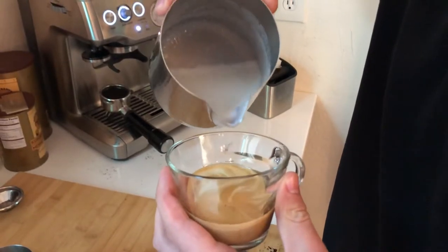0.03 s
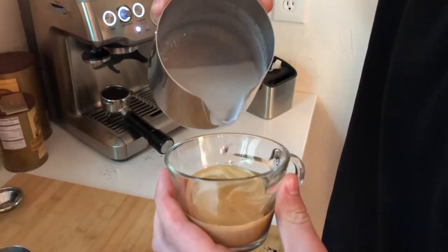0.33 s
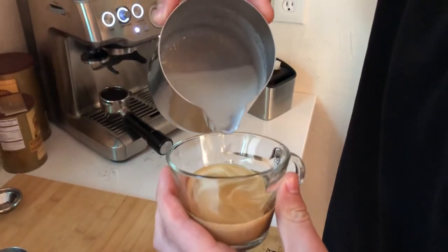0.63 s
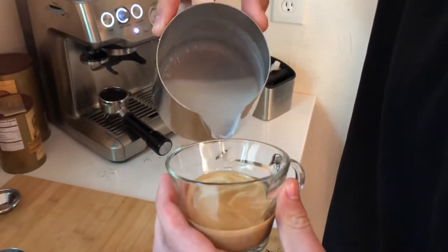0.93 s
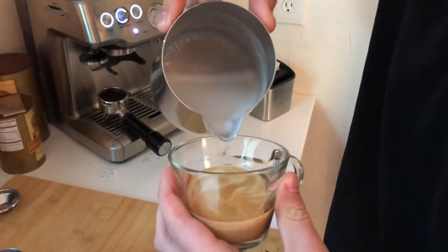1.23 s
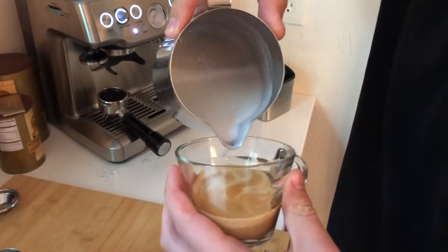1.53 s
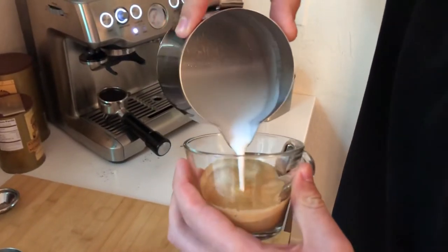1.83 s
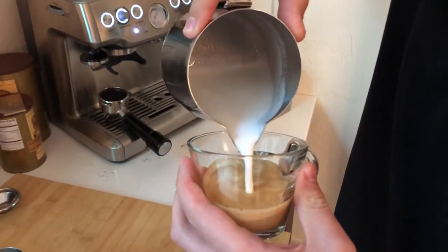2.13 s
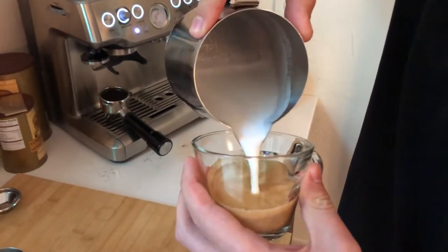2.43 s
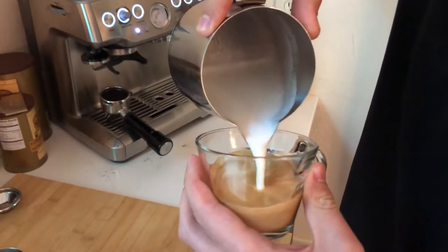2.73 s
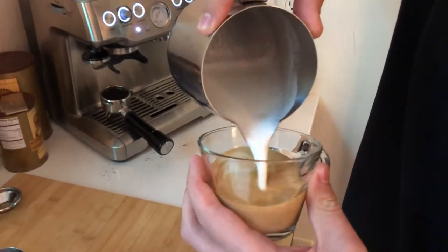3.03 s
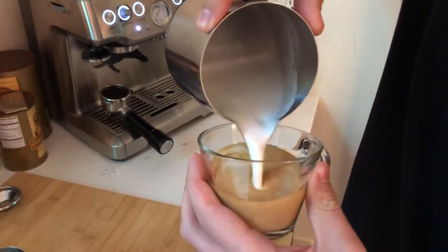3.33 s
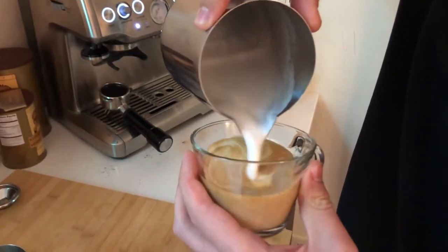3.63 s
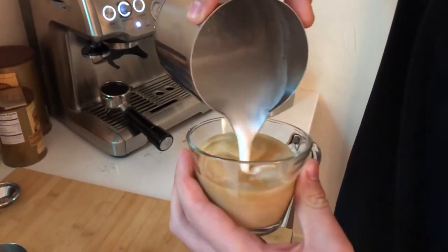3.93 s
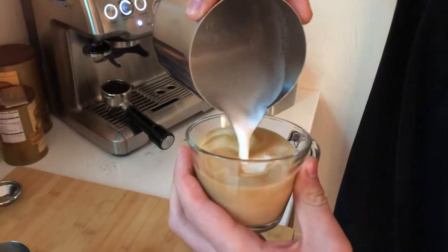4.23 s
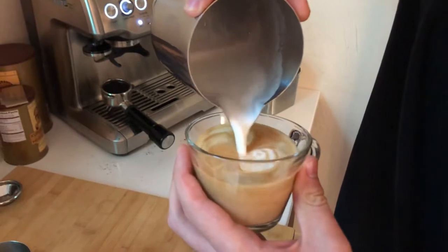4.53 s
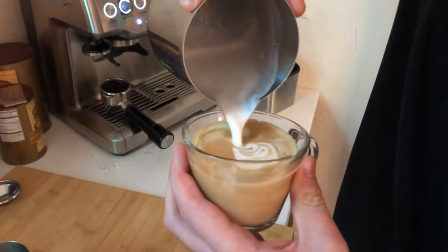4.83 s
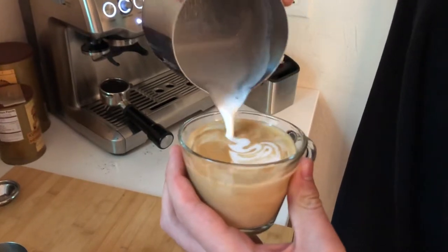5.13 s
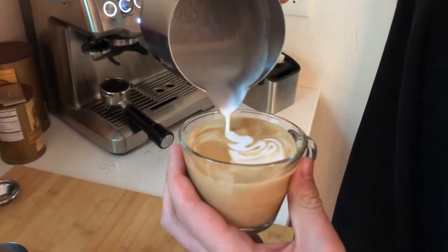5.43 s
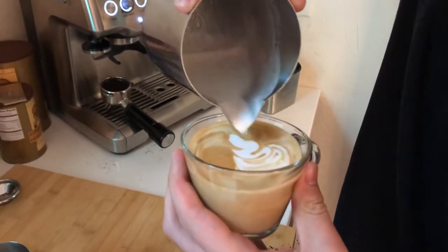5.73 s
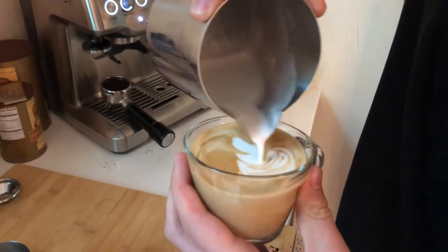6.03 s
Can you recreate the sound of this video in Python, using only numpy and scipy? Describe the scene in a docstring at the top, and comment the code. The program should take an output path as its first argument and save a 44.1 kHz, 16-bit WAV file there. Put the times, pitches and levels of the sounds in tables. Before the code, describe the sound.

Soft handling bumps and a low rumble come first. About a second in, a steel pitcher strikes a glass cup with a sharp clink and a short ring. Faint, thin squeaks follow, and milk lands with a tiny plip and a slowly growing fizz of foam. Later the spout ticks lightly on the rim and scrapes softly a few times. Everything is close to the microphone in a quiet kitchen.

```python
"""Milk poured from a steel pitcher into a hand-held glass cup, close to one microphone in a quiet kitchen.
Soft bumps and a low rumble come first, as the hands move into place. At one second the pitcher clinks
against the cup, and faint, thin, high squeals follow in short bursts. The first milk lands with
a plip and a thin fizz of foam grows. The spout ticks on the rim, the rumble swells a little as the
pitcher rocks, and the spout drags a few times. From five seconds on, fizz, bumps and room noise remain."""
import sys
import numpy as np
from scipy import signal
from scipy.fft import rfft, irfft, next_fast_len
from scipy.io import wavfile
from scipy.ndimage import uniform_filter1d

SR = 44100
rng = np.random.default_rng(int(sys.argv[2]) if len(sys.argv) > 2 else 0)


def log_audio(samples):
    """Write samples as a 16-bit WAV file to the path given in sys.argv[1]."""
    # one column per channel
    frames = np.atleast_2d(samples).T
    # limit to full scale, then quantise
    limited = np.clip(frames, -1, 1)
    pcm = np.round(limited * 32767).astype(np.int16)
    wavfile.write(sys.argv[1], SR, pcm)


N = 268039
TIME = np.arange(N) / SR
RING_TIME = np.arange(SR // 4) / SR


def amp(db):
    """Decibels to gain."""
    return 10 ** (np.asarray(db) / 20)


def unit(x):
    """Scales to rms 1."""
    return x / np.sqrt(np.mean(x ** 2) + 1e-30)


def read(points, hz):
    """Reads a table on a log-frequency axis."""
    f, value = np.transpose(points)
    return np.interp(np.log(hz + 1), np.log(f + 1), value)


def add(mix, start_s, sound):
    """Mixes a sound in at its start time."""
    part = mix[max(round(start_s * SR), 0):][:len(sound)]
    part += sound[:len(part)]


def colour(x, spectrum):
    """Gives x a spectrum, at rms 1."""
    size = next_fast_len(len(x))
    gain = amp(read(spectrum, np.fft.rfftfreq(size, 1 / SR)))
    return unit(irfft(rfft(x, size) * gain, size)[:len(x)])


def excite(force, response):
    """Sounds a body's response at every push of the force."""
    return signal.oaconvolve(force, response)[:N]


def ring(modes, cycles, pitch=1):
    """Dying sines of alternating sign; each takes some cycles to build up."""
    out = 0
    for k, (hz, db, t60) in enumerate(modes):
        turns = hz * pitch * RING_TIME
        attack = 1 - np.exp(-(turns / cycles) ** 2)
        decay = np.exp(-np.log(1000) * RING_TIME / t60)
        out = out + (-1) ** k * amp(db) * attack * decay * np.sin(2 * np.pi * turns)
    return out


def grains(per_s, spread_db):
    """A random train of clicks of uneven size."""
    size = amp(spread_db * np.minimum(rng.exponential(1, N), 4))
    return unit(size * rng.standard_normal(N) * (rng.random(N) < per_s / SR))


def stroke(middle_s, half_s):
    """A smooth rise and fall, lasting half_s on either side of its middle."""
    return np.cos(np.pi * np.clip((TIME - middle_s) / (2 * half_s), -.5, .5)) ** 4


def rumble_db(moving_db=-59.5, settled_db=-63.5, settle_s=1.2, calm_db_per_s=.41, rocking_db=1.55):
    """Handling level: it drops as the hands settle, eases slowly, and swells as the pitcher rocks."""
    moving = 1 / (1 + np.exp((TIME - settle_s) / .1))
    rocking = rocking_db * stroke(middle_s=4.1, half_s=1.5)
    pouring_db = settled_db - calm_db_per_s * (TIME - settle_s) + rocking
    return moving * moving_db + (1 - moving) * pouring_db


# Air and low rumble at the microphone. Each row: frequency in Hz, relative level in dB.
AIR_SPECTRUM = [(800, -20), (1350, -3.5), (1650, -3), (2200, -7), (3300, -8.5), (4000, -7), (4800, -9.5),
                (6600, -13), (8000, -15), (12500, -18), (16000, -18.5)]
RUMBLE_SPECTRUM = [(25, -18), (45, -9), (61, -1.5), (80, -5.5), (132, 2.5), (265, 1), (295, -5.5), (335, 2),
                   (420, -6), (600, -7), (780, -12.5), (1030, -8), (1400, -18), (2300, -39.5)]
def background(air_db=-75.5, handling_gain_db=-.85, deep_gain_db=-64, deep_hz=115):
    """Even room air and a low rumble that follows the hands; its deepest part stays steady."""
    low = colour(rng.standard_normal(N), RUMBLE_SPECTRUM)
    deep = signal.sosfiltfilt(signal.butter(3, deep_hz, fs=SR, output="sos"), low)
    rumble = amp(deep_gain_db) * deep + amp(rumble_db() + handling_gain_db) * (low - deep)
    return rumble + amp(air_db) * colour(rng.standard_normal(N), AIR_SPECTRUM)


# The kitchen's decay. Each row: frequency in Hz, time to fall 60 dB (t60) in seconds.
KITCHEN_DECAY = [(200, .5), (750, 0.82), (2000, 0.82), (4000, 0.65), (9000, 0.25)]
# The tone of its tail. Each row: frequency in Hz, gain in dB.
KITCHEN_TONE = [(200, -7), (500, -7.5), (770, 1.5), (1000, -2), (1300, -2.5), (1650, -1), (2100, 2),
                (2400, 3), (3000, -3.5), (5000, 1.5), (12000, -1)]
def kitchen(direct, wet_db=-21, build_s=.0077, reflections_per_s=3000):
    """Adds the room's reflections, faint at this close distance, each band dying at its own speed."""
    taps = rng.choice([-1., 1.], SR) * (rng.random(SR) < reflections_per_s / SR)
    taps *= 1 - np.exp(-(np.arange(SR) / SR / build_s) ** 2)
    hz, t, bands = signal.stft(taps, SR, nperseg=256)
    bands *= np.exp(-np.log(1000) * t / read(KITCHEN_DECAY, hz)[:, None])
    plain = signal.istft(bands, SR, nperseg=256)[1]
    tail = signal.istft(bands * amp(read(KITCHEN_TONE, hz))[:, None], SR, nperseg=256)[1]
    return direct + amp(wet_db) * excite(direct, tail / np.linalg.norm(plain))


# The clearest handling bumps. Each row: start in seconds, relative level in dB.
HAND_BUMPS = [(.123, -50), (.244, -52.5), (.283, -52.5), (.556, -54.5), (.712, -49), (1.157, -50.5),
              (1.572, -46), (2.253, -53), (2.395, -53), (2.75, -52), (2.905, -54), (3.015, -53),
              (3.72, -51), (3.867, -50), (3.888, -52), (4.546, -50), (4.742, -50), (4.889, -51.5),
              (5.806, -58)]
# Their dull body. Each row: frequency in Hz, relative level in dB, t60 in seconds.
BUMP_RING = [(200, -13, .04), (267, -12, 0.094), (337, -6, .07), (383.8, -11, .05), (462, -8.5, .06),
             (565, -10, .04), (650, -10.5, .04), (849, -13.5, 0.055), (923, -17, 0.0498),
             (1017.5, -7.5, 0.053), (1176, -14.5, 0.037)]
def handling_bumps(gain_db=3.3, rattle=.062, rattle_s=.009, tiny_db=-7, light_db=-10):
    """Dull nudges, each with a brief rattle, among light and tiny random ones that follow the rumble."""
    push = np.zeros(N)
    for start_s, db in HAND_BUMPS:
        nudge = rattle * rng.standard_normal(len(RING_TIME)) * np.exp(-RING_TIME / rattle_s)
        nudge[0] += 1
        add(push, start_s, amp(db + gain_db) * nudge)
    body = ring(BUMP_RING, cycles=.62)
    tiny = unit(excite(grains(per_s=200, spread_db=1.6), body))
    light = unit(excite(np.sign(grains(per_s=8, spread_db=0)), body))
    return excite(push, body) + amp(rumble_db()) * (amp(tiny_db) * tiny + amp(light_db) * light)


# Foam in the cup, heard from close by. Each row: frequency in Hz, relative level in dB.
FOAM_SPECTRUM = [(1200, -22), (2000, -14), (3200, -5), (6000, -0.5), (8500, 2), (12000, 0.8), (16000, 1.5)]
def milk(pour_s=1.6, covered_s=3.9, first_db=-91.5, full_db=-79.5, clump_db=2, swell_db=.8,
         plip_s=1.676, plip_hz=1240, plip_db=-43, plip_t60=.025):
    """One bubble rings as the stream lands; the fizz grows unevenly until foam covers the coffee."""
    clumps = unit(uniform_filter1d(rng.standard_normal(N), round(.05 * SR)))
    swells = unit(uniform_filter1d(rng.standard_normal(N), round(.2 * SR)))
    growth_db = np.interp(TIME, [pour_s, covered_s], [first_db, full_db])
    foam = (TIME > pour_s) * amp(growth_db + clump_db * clumps + swell_db * swells)
    out = foam * colour(grains(per_s=4500, spread_db=2), FOAM_SPECTRUM)
    add(out, plip_s, ring([(plip_hz, plip_db, plip_t60)], cycles=1.6))
    return out


# Short, thin squeals, and the later drags of the spout.
# Each row: middle in seconds, relative level in dB, half-length in seconds.
THIN_SQUEALS = [(1.125, -73, .06), (1.29, -72.5, 0.12), (1.532, -72, .04), (1.614, -69, 0.059),
                (1.675, -76.5, .06), (2.01, -74.5, 0.048), (2.449, -72.5, 0.037), (2.552, -71.5, .031),
                (3.012, -76, .06), (3.115, -77.5, 0.064), (3.286, -73.5, .05)]
SPOUT_DRAGS = [(4.42, -63, 0.11), (4.59, -67.5, 0.18), (4.75, -63, .14), (4.961, -68, 0.11)]
# Stretches of fainter, random squeaks. Each row: start and end in seconds, relative level in dB.
FAINT_SQUEAKS = [(1.0, 2.743, -89), (2.75, 3.85, -81), (4.05, 5.003, -87)]
# The high tones of both. Each row: frequency in Hz, relative level in dB, t60 in seconds.
SQUEAL_RING = [(2430, -3.5, 0.024), (5176, -1.5, .033), (9410, 0.5, .028), (12740, -8.5, .022)]
# Dry grit under the squeal, and the rasp of a drag. Each row: frequency in Hz, relative level in dB.
GRIT_SPECTRUM = [(900, -15), (1700, 2), (2500, 1), (3200, -7), (4600, -10), (5200, -5), (6000, -13),
                 (16000, -20)]
RASP_SPECTRUM = [(900, -24.5), (1170, -12.5), (1285, 0.5), (1480, -24), (2300, -19), (2850, -21.5),
                 (3100, -15.5), (3350, -25.5), (4700, -28.5), (5300, -21.5), (7700, -43), (8280, -20),
                 (8700, -40), (16000, -43)]
def squeals_and_drags(squeal_gain_db=.75, rasp_gain_db=-.5, drag_squeal_db=-13, grit_db=-7, squeak_s=.056):
    """Dense clicks ring as faint, high squeals in short bursts; the dragging spout rasps lower."""
    pressure = sum(amp(db) * stroke(middle_s, half_s) for middle_s, db, half_s in SPOUT_DRAGS)
    bursts = sum(amp(db) * stroke(middle_s, half_s) for middle_s, db, half_s in THIN_SQUEALS)
    bursts += amp(drag_squeal_db) * pressure
    pulses = abs(grains(per_s=25, spread_db=2)) ** .5
    flicker = unit(signal.oaconvolve(pulses, np.hanning(round(squeak_s * SR)), "same"))
    squeaks = flicker * sum(amp(db) * ((TIME > start) & (TIME < end)) for start, end, db in FAINT_SQUEAKS)
    clicks = grains(per_s=2000, spread_db=1.5)
    grit = amp(grit_db) * colour(clicks, GRIT_SPECTRUM)
    squeal = unit(excite(clicks, ring(SQUEAL_RING, cycles=1))) + grit
    rasp = colour(grains(per_s=1500, spread_db=3), RASP_SPECTRUM)
    return amp(squeal_gain_db) * np.hypot(bursts, squeaks) * squeal + amp(rasp_gain_db) * pressure * rasp


# The spout ticks on the rim.
# Each row: start in seconds, relative level in dB, treble cutoff in Hz, factor on the rim's pitch.
SPOUT_TICKS = [(3.3818, -37.5, 2020, 0.987), (4.0595, -39, 3560, 1.04), (4.2260, -49.5, 2460, 1.04),
               (4.3042, -50, 2360, 1.05), (4.5600, -54.5, 3100, 1.03), (4.601, -55, 1390, 1.11)]
# The rim, damped by the hand. Each row: base frequency in Hz, relative level in dB, t60 in seconds.
RIM_RING = [(335, -12, 0.081), (452, -10, 0.052), (659, -5.5, 0.061), (1171, 1.5, 0.044), (1604, -0.5, .03),
            (2010, -6, 0.023), (2380, -1.5, 0.032), (2825, -2, 0.029), (3550, -11, 0.035),
            (5090, -5, 0.025), (6300, -24, .02), (9200, -7, .028)]
def spout_ticks(grate_db=-14, grate_s=.014):
    """Light touches; a softer contact rings fewer high modes, and the edge grates briefly."""
    out, t = np.zeros(N), RING_TIME
    for start_s, tick_db, cutoff_hz, pitch in SPOUT_TICKS:
        modes = [(hz, db - 10 * np.log10(1 + (hz / cutoff_hz) ** 4), t60) for hz, db, t60 in RIM_RING]
        rim = ring(modes, cycles=1.53, pitch=pitch)
        band = signal.butter(3, [400, cutoff_hz], "band", fs=SR)
        grate = unit(signal.lfilter(*band, rng.standard_normal(len(t)))) * np.exp(-t / grate_s)
        add(out, start_s, amp(tick_db) * (rim + amp(grate_db) * grate))
    return out


# Pitcher and cup struck together near the microphone, and the cup's one lingering note.
# Each row: frequency in Hz, relative level in dB, t60 in seconds.
CLINK_RING = [(150, -50, .06), (250, -45, .05), (420, -43, .04), (683, -21.5, 0.07), (760, -14.5, .068),
              (831, -24, .029), (965, -38, 0.041), (1264, -17, 0.027), (1510, -19.5, .028),
              (1670, -25.5, 0.022), (1880, -23.5, .026), (2110, -20.5, 0.034), (2330, -37, 0.077),
              (2734, -24, 0.019), (2990, -25, 0.025), (3545, -27.5, 0.025), (4220, -33.5, 0.021),
              (4500, -37.5, 0.018), (4930, -32.5, 0.021), (5250, -38.5, .022), (6340, -44, 0.036),
              (6760, -43, .026), (8130, -51, .03), (9450, -47, .025)]
LINGERING_NOTE = (778, -37, .35)
# The crack of first contact. Each row: frequency in Hz, relative level in dB.
CRACK_SPECTRUM = [(300, -18.5), (1000, -12), (1500, 0), (4500, 1.5), (5800, -11), (7200, -7), (11000, -13),
                  (16000, -23.5)]
def pitcher_clink(start_s=.9856, ring_gain_db=-.5, crack_db=-30.2, crack_s=.0024,
                  counter_db=-47, counter_s=.008,
                  swell_db=-54, swell_at_s=1.299, swell_width_s=.023, swell_cutoff_hz=1100):
    """A crack, its reflection off the counter and a short ring that swells faintly once more."""
    out, t = np.zeros(N), RING_TIME
    body = ring(CLINK_RING, cycles=1.35) + ring([LINGERING_NOTE], cycles=1.5)
    add(out, start_s, amp(ring_gain_db) * body)
    crack = amp(crack_db) * 2 * t / crack_s * np.exp(1 - 2 * t / crack_s)
    reflection = amp(counter_db) * (1 - np.exp(-t / crack_s)) * np.exp(-t / counter_s)
    add(out, start_s, colour(rng.standard_normal(len(t)), CRACK_SPECTRUM) * (crack + reflection))
    dull_noise = signal.lfilter(*signal.butter(2, swell_cutoff_hz, fs=SR), rng.standard_normal(N))
    late_swell = np.exp(-((TIME - swell_at_s) / swell_width_s) ** 2)
    return out + amp(swell_db) * late_swell * unit(excite(dull_noise, body))


def scene():
    """Cup and pitcher close to one microphone, with the kitchen behind them."""
    close = pitcher_clink() + spout_ticks() + squeals_and_drags() + handling_bumps() + milk()
    return (kitchen(close) + background())[None]


def record(dry):
    """The recorder's band limit takes off the highest treble."""
    lowpass = signal.firwin(511, cutoff=15850, window=("kaiser", 9), fs=SR)
    return signal.oaconvolve(dry, lowpass[None], "same")


dry = scene()
out = record(dry)
log_audio(out)
```